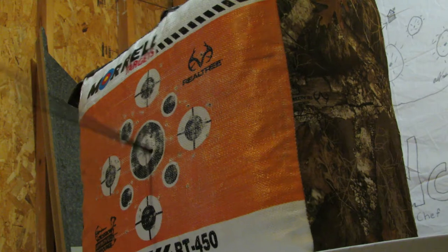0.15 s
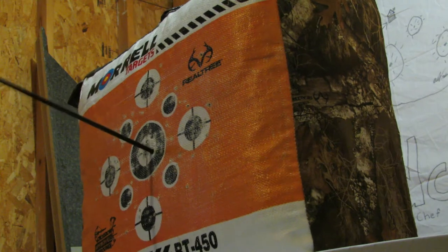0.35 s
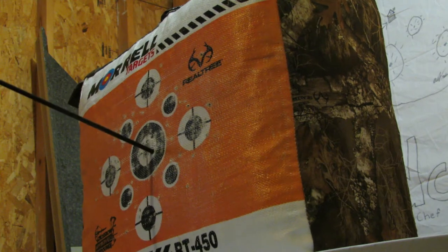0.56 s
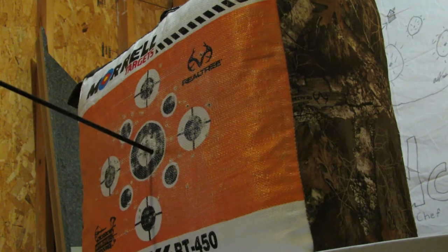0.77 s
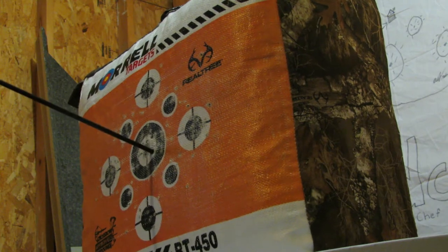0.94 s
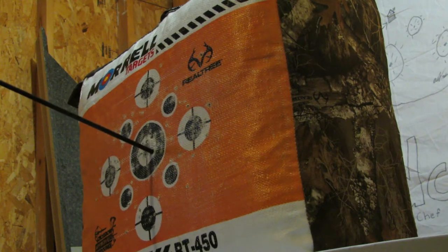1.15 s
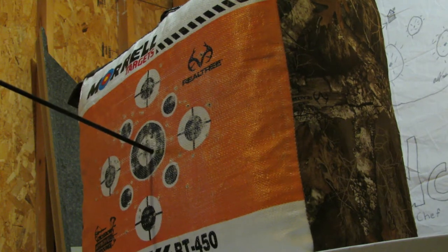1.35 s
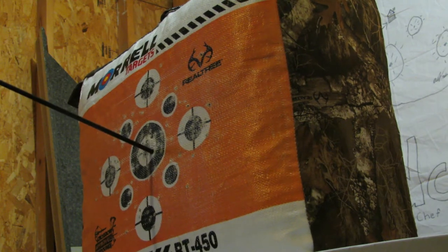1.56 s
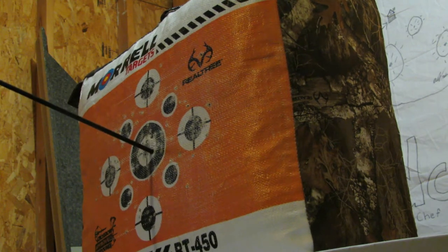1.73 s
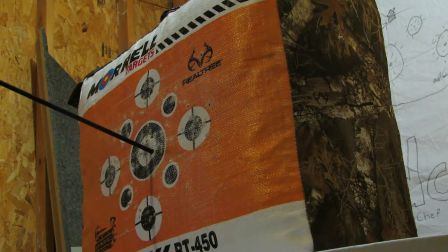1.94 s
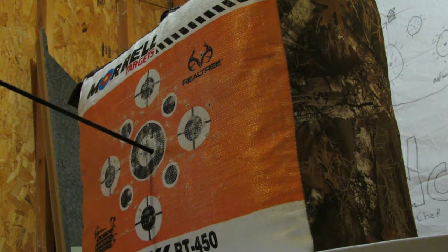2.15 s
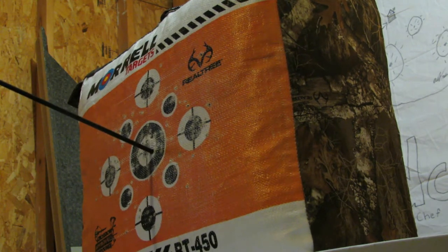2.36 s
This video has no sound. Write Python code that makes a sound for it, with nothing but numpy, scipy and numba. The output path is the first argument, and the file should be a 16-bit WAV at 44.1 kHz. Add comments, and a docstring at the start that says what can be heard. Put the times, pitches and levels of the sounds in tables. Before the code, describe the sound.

An arrow smacks into a stuffed bag target close to the microphone, a split second after the bow's sharp snap. The thud dies away in a small room, leaving quiet background hiss and a faint swish of cloth.

```python
"""In a small wood-lined range, a bow is shot and the arrow smacks into a stuffed bag by the microphone.
The string whirs forward and its sudden stop makes the limbs snap and ring; the vanes hiss in flight.
The impact slaps, drives the damped modes of the bag and reverberates in the room. Automatic gain control
ducks and creeps back over the room tone; later comes a soft swish, as of a sleeve."""
import sys
import numpy as np
from scipy import signal
from scipy.fft import rfft, irfft
from scipy.io import wavfile
from scipy.ndimage import minimum_filter1d
from numba import njit

SR = 44100
rng = np.random.default_rng(int(sys.argv[2]) if len(sys.argv) > 2 else 0)


def store_wav(level_fs):
    """Save 16-bit WAV to argv[1]."""
    pcm = np.round(np.clip(np.atleast_2d(level_fs), -1, 1) * 32767)
    wavfile.write(sys.argv[1], SR, pcm.T.astype(np.int16))


N = 110250
LOOSE_S, SNAP_S, HIT_S = .095, .1172, .1638  # string released, string stops, arrow lands

# Noise spectra. Each row: frequency in Hz, relative spectral density in dB.
ROOM_TONE_SPECTRUM = [(15, -37), (25, -6), (64, 2), (233, -6), (469, -11), (741, -12), (970, -16),
                      (2700, -23), (5280, -26.5), (5730, -27.5), (11200, -28.5), (15500, -35)]
CLOTH_SPECTRUM = [(100, -5), (600, 1), (1500, -1.5), (2800, -10.5), (4000, -9.5), (4600, -3.5),
                  (5200, -3.5), (6000, -8.5), (7200, -12), (7800, -10), (9500, -7), (13000, -15.5),
                  (16000, -26)]
VANE_SPECTRUM = [(100, -14), (700, -1.5), (1500, -5.5), (4000, -2.5), (7000, -0.5), (10000, -6.5),
                 (16000, -15)]
BOW_SPECTRUM = [(40, -25), (200, -15.5), (500, -10), (1200, -7), (2000, 0.5), (2800, 0.5), (5600, 0),
                (8000, -6.5), (12000, -12.5), (16000, -18)]
CRACK_SPECTRUM = [(200, -7.5), (1700, -0.5), (4000, -7), (8500, 1.5), (12000, -8), (16000, -18.5)]
THUD_SPECTRUM = [(30, -22), (80, -7), (190, -13), (320, -4.5), (400, 1), (560, -19), (950, -8.5),
                 (2000, -22), (6000, -44)]
# Stereo widths. Each row: frequency in Hz, level of side over mid in dB.
ROOM_TONE_WIDTH = [(30, 2), (100, 7.5), (400, 7.5), (1200, 4), (3500, 0), (6000, -1), (8000, -19)]
CLOTH_WIDTH = [(300, 2), (1500, -4.5), (5500, 0), (8000, -31)]
DIFFUSE_WIDTH = [(100, -6), (450, -7.5), (1000, -3), (2500, 0), (6000, -0.5), (10000, -2)]
# Reverberation bands. Each row: frequency in Hz, 60 dB decay time in seconds, relative level in dB.
ROOM_BANDS = [(80, .75, -0.5), (170, 0.98, -6.5), (359.8, 0.52, 1.5), (580, .42, -1.5), (935, .39, 0.5),
              (1490, .39, -1.5), (3000, 0.41, 0), (6000, .35, -2), (10000, 0.32, -1), (16000, 0.39, -3.5)]
# Pushes of the sleeve. Each row: peak time in seconds, Gaussian width in seconds, level in dB.
SLEEVE_PUSHES = [(2.218, 0.032, -50.5), (2.282, 0.021, -51), (2.331, 0.031, -56)]
# Decaying tones. Each row: frequency in Hz, relative level in dB, 60 dB decay time in seconds.
SNAP_RING_TONES = [(2114, -3, .32), (2336, -3.5, 0.18), (2617, -3.5, .3), (3165, -5.5, 0.42),
                   (3966, -4.5, 0.2), (4140, -6.5, 0.15), (4260, 0, 0.31), (4980, 1.5, .27),
                   (6880, -4, 0.11)]  # faint high tones that colour the bow's snap
LIMB_STRING_MODES = [(82.3, 5, 0.092), (237.6, -3.5, .48), (320, 5, .09), (830, -8.5, .15), (1120, -2, .12)]
BAG_STAND_MODES = [(69, -11, 0.42), (99, -8.5, .42), (121.5, -10, .35), (155.6, -11, 0.29),
                   (255, -21, 0.91), (335.5, -7.5, 0.18), (361, -1, .35), (403.5, 0, .08), (412, -1.5, .25),
                   (431, -5.5, 0.24), (654, -20, .3)]


def undb(db):
    return 10 ** (np.asarray(db) / 20)


def clock():
    return np.arange(N) / SR


def per_bin(points):
    """Interpolation of (Hz, value) points over the FFT bins, in log frequency."""
    hz, value = np.array(points, float).T
    return np.interp(np.log(np.arange(N // 2 + 1) * SR / N + 1e-9), np.log(hz), value)


def noise(spectrum, width):
    """Spectral shaping of white noise into stereo; the mid signal has rms 1."""
    mid, side = rfft(rng.standard_normal((2, N))) * undb(per_bin(spectrum))
    mid, side = irfft(mid, N), irfft(side * undb(per_bin(width)), N)
    return np.array([mid + side, mid - side]) / mid.std()


def pan(left_db):
    """A level difference between the channels places a source."""
    return undb(np.array([[left_db], [-left_db]]) / 2)


def decay(start, t60):
    """Exponential decay from a sudden onset, 60 dB in t60 seconds."""
    age = clock() - start
    return (age >= 0) * np.exp(-np.log(1000) * np.maximum(age, 0) / t60)


def ring(start, tones):
    """Superposition of damped sinusoids that start together."""
    age = clock() - start
    return sum(undb(db) * decay(start, t60) * np.sin(2 * np.pi * hz * age) for hz, db, t60 in tones)


def pulse(at, width):
    """A pressure pulse of peak 1: compression, then rarefaction."""
    u = (clock() - at) / width
    return -u * np.exp((1 - u ** 2) / 2)


def high_pass(x, hz, order):
    return signal.sosfilt(signal.butter(order, hz, "high", fs=SR, output="sos"), x)


@njit
def follow(x, rise_s, fall_s):
    """First-order lag with separate time constants for rising and falling."""
    y, level = np.empty(len(x)), 0.
    for i in range(len(x)):
        level += (x[i] - level) / (SR * (rise_s if x[i] > level else fall_s))
        y[i] = level
    return y


def room_tone(whine_hz=5320, half_width_hz=57):
    """Broadband noise rumbles and hisses; a narrow band of noise is heard as an unsteady whine."""
    hz = np.arange(N // 2 + 1) * SR / N
    peak = 1 + ((hz - whine_hz) / half_width_hz) ** 2
    whine = irfft(rfft(rng.standard_normal((2, N))) / peak, N)
    return undb(-54) * noise(ROOM_TONE_SPECTRUM, ROOM_TONE_WIDTH) + undb(-72.5) * whine / whine.std()


def reverberation(x, onset_s=.005):
    """Convolution with a diffuse field that builds up quickly; the bass outlasts the treble."""
    white = rfft(noise([(1, 0), (SR, 0)], DIFFUSE_WIDTH))
    tail = np.zeros((2, N))
    for hz, t60, db in ROOM_BANDS:
        band = per_bin([(row[0], float(row[0] == hz)) for row in ROOM_BANDS])
        tail += undb(db) * irfft(white * band, N) * decay(0, t60)
    tail *= 1 - np.exp(-(clock() / onset_s) ** 2)
    tail /= np.sqrt(np.sum(tail ** 2) / 2)
    return signal.fftconvolve(x, tail, axes=1)[:, :N]


def sleeve():
    """Friction noise: cloth swishes softly in overlapping pushes."""
    pushes = sum(undb(db) * np.exp(-((clock() - at) / width) ** 2 / 2) for at, width, db in SLEEVE_PUSHES)
    return pushes * noise(CLOTH_SPECTRUM, CLOTH_WIDTH)


def vanes(rise_db_per_s=61.5):
    """Turbulence at the vanes hisses louder as the arrow nears, and stops when it lands."""
    t = clock()
    approach = (t > SNAP_S) * (t < HIT_S) * undb(-8.5 - rise_db_per_s * np.abs(HIT_S - t))
    fade_in = np.clip((t - SNAP_S) / (HIT_S - SNAP_S) * 2, 0, 1)
    hiss = approach * fade_in * noise(VANE_SPECTRUM, DIFFUSE_WIDTH)
    return hiss + undb(-4) * reverberation(hiss[:1])


def bow(rise_s=.0042, knock_width_s=.00018):
    """Impulsive excitation: the whirring string stops; the limbs knock and ring with a bright rattle."""
    t = clock()
    stroke = np.clip((t - LOOSE_S) / (SNAP_S - LOOSE_S), 0, 1)
    whir = (t > LOOSE_S) * (t < SNAP_S) * undb(-41.5 + 9 * stroke)
    swell = (1 + np.tanh((t - SNAP_S - rise_s) / rise_s)) / 2
    rattle = undb(-4) * swell * np.maximum(decay(SNAP_S, t60=.19), t < SNAP_S)
    knock = undb(-18.5) * pulse(SNAP_S + 2 * knock_width_s, knock_width_s)
    snap = (whir + rattle) * noise(BOW_SPECTRUM, DIFFUSE_WIDTH) + knock
    high_tones = undb(-17) * swell * ring(SNAP_S, SNAP_RING_TONES)
    limbs = undb(-23.5) * ring(SNAP_S, LIMB_STRING_MODES)
    return pan(left_db=5.5) * (snap + high_tones + limbs) + undb(-3) * reverberation(snap[:1])


def bag(slap_width_s=.00014):
    """Inelastic impact: the point slaps and cracks through the cover; the stuffing thuds, the bag booms."""
    slap = undb(13) * high_pass(pulse(HIT_S + slap_width_s, slap_width_s), hz=300, order=1)
    crack = undb(-1.5) * decay(HIT_S, t60=.023) * noise(CRACK_SPECTRUM, DIFFUSE_WIDTH)[:1]
    thud = undb(-8) * decay(HIT_S, t60=.15) * noise(THUD_SPECTRUM, DIFFUSE_WIDTH)
    boom = undb(-6.5) * ring(HIT_S, BAG_STAND_MODES)
    reflections = undb(-4) * reverberation(slap + crack + thud[:1])
    return slap + crack + pan(left_db=4.5) * (thud + boom) + reflections


def scene():
    """Superposition of the shot, less its deepest bass, with the sleeve and the room tone."""
    shot = high_pass(bow() + vanes() + bag(), hz=55, order=2)
    return shot + sleeve() + room_tone()


def record(dry, threshold_db=-16, max_duck_db=14.5, detect_s=.0016, hold_s=.39):
    """Automatic gain control ducks, holds and recovers; clipping and a low-pass filter follow."""
    power = follow(np.mean(dry ** 2, axis=0), detect_s, detect_s)
    excess_db = np.clip(10 * np.log10(power + 1e-12) - threshold_db, 0, max_duck_db)
    half = int(hold_s * SR / 2)
    # running maximum over the past hold time
    held_db = -minimum_filter1d(-excess_db, 2 * half + 1, origin=half, mode="constant")
    ducked = dry * undb(-follow(held_db, rise_s=.0012, fall_s=.53))
    low_pass = signal.ellip(10, .1, 80, 15900, fs=SR, output="sos")
    return signal.sosfilt(low_pass, np.clip(ducked, -1, 1))


dry = scene()
out = record(dry)
store_wav(out)
```